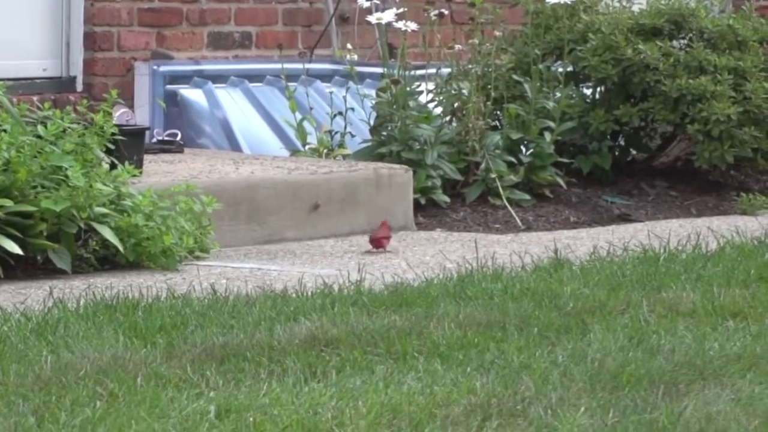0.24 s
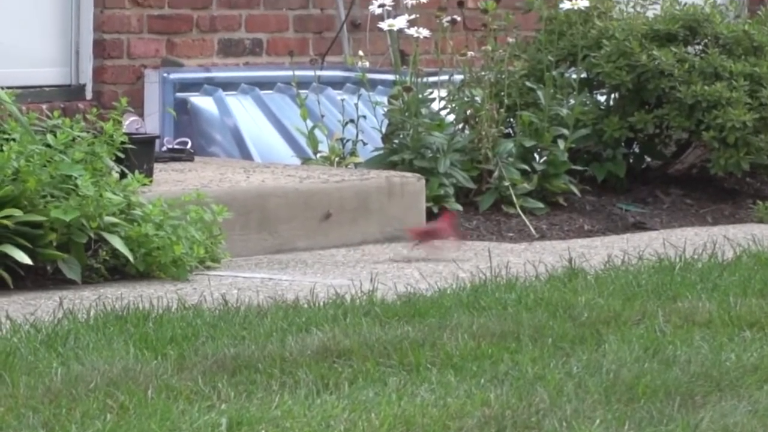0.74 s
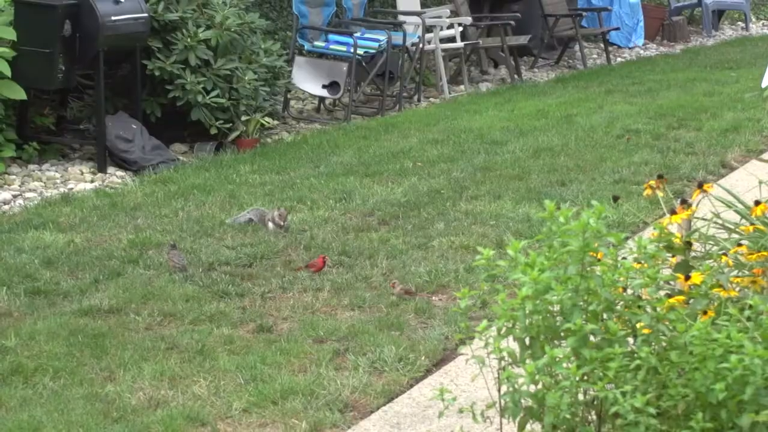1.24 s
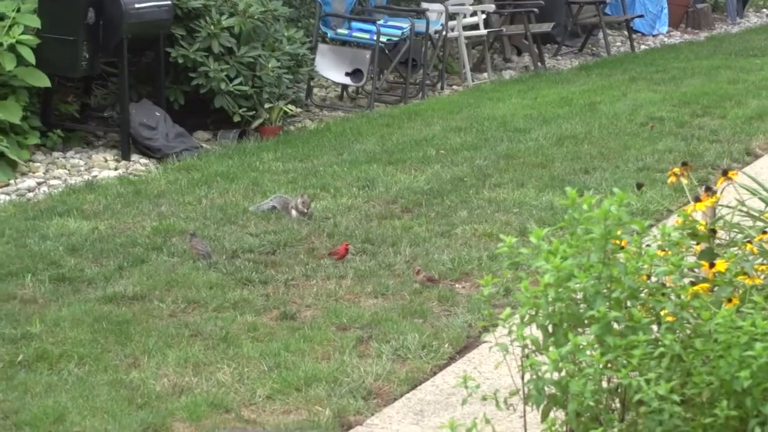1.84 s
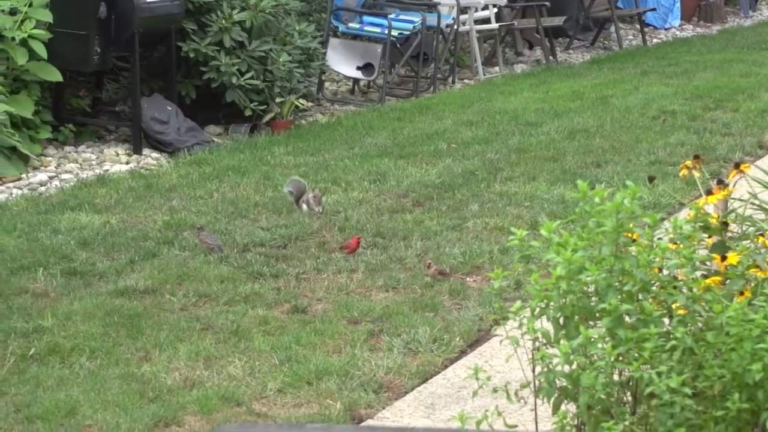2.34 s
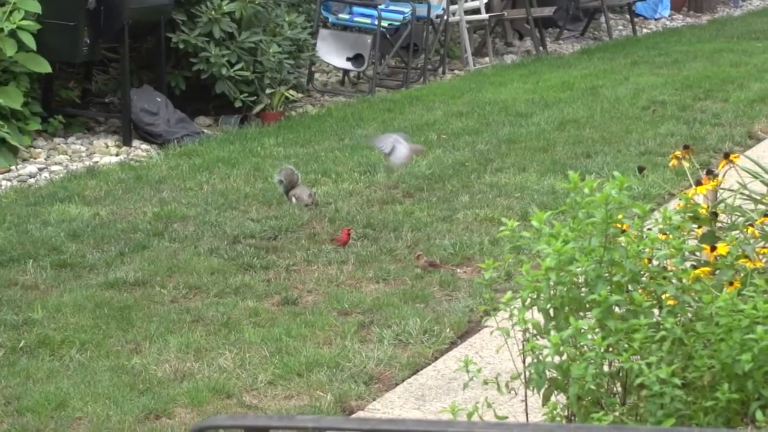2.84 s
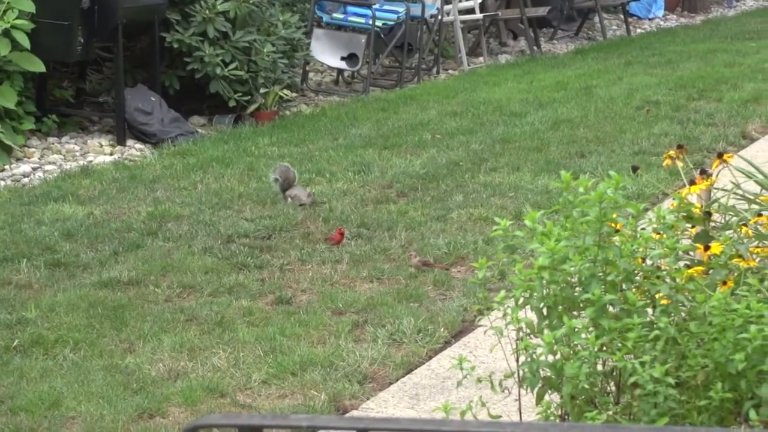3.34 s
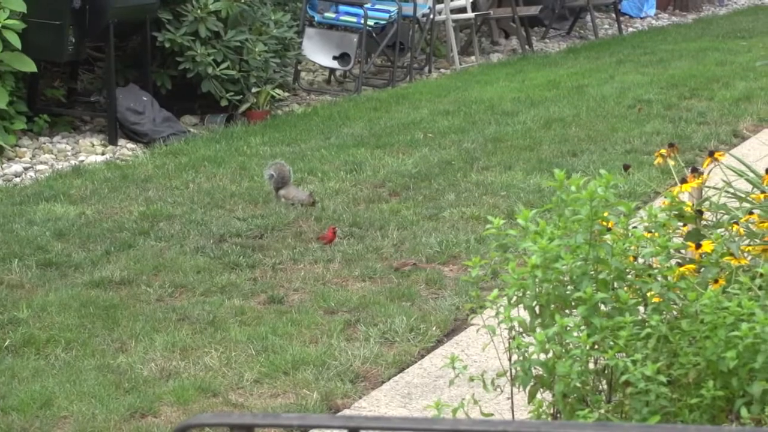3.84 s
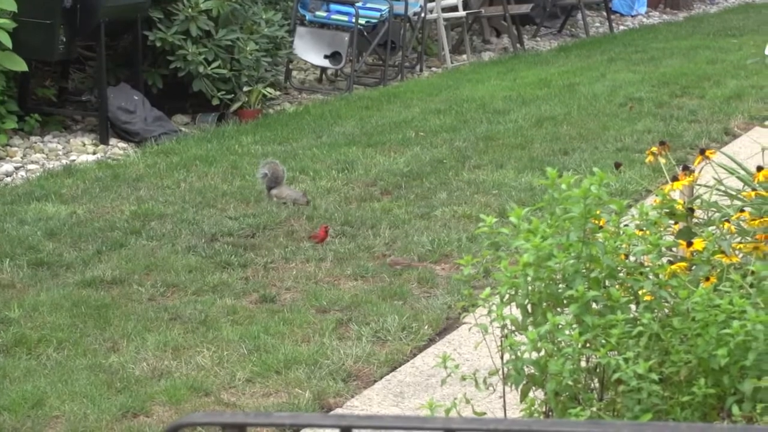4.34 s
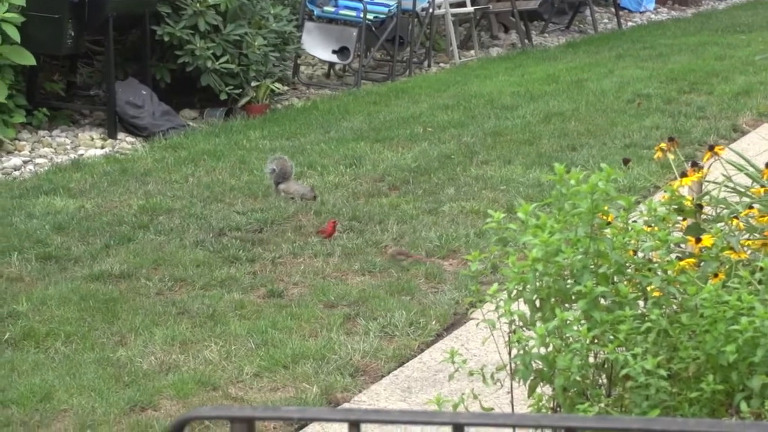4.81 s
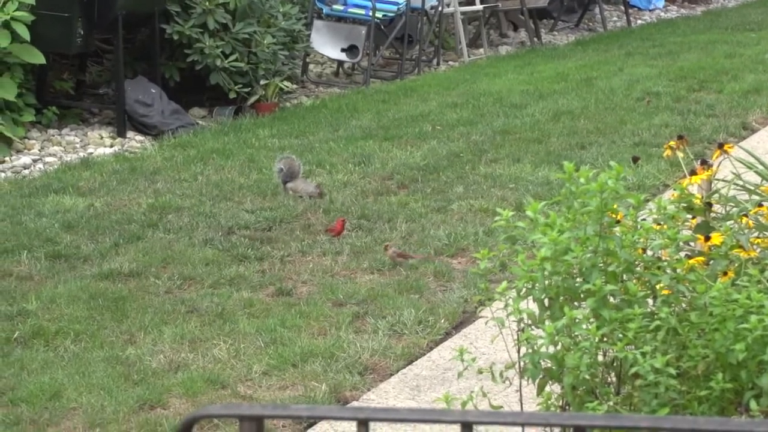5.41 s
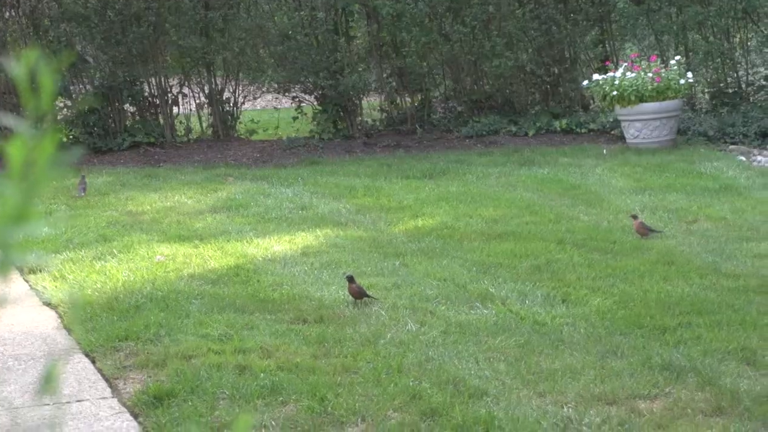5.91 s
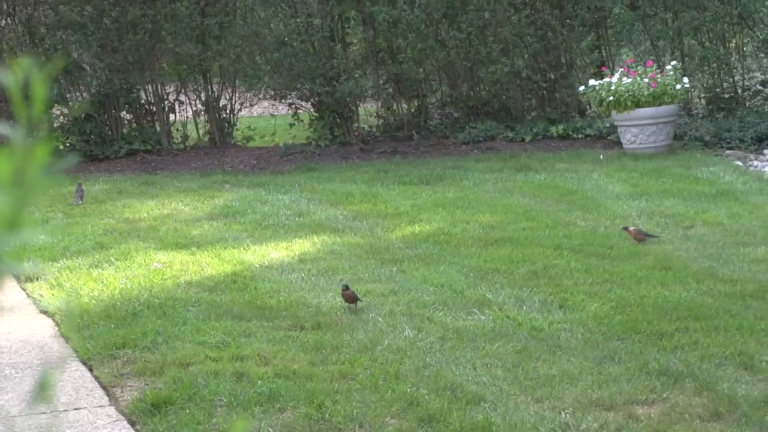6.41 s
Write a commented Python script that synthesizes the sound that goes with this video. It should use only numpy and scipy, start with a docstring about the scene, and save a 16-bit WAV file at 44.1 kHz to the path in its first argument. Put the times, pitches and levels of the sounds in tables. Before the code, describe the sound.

An open summer garden in wide stereo, with soft, quiet outdoor air. From 0 s a nearer cicada buzzes, raspy and fluttering, strongest at the start; its tone slackens and grows more hollow towards 1.3 s. Beneath it, a far motor drones low in uneven throbs, slowly climbing in pitch, with a faint rush. Tiny dry ticks snap at about 0.1, 0.3 and 0.55 s, and again at 2.2 s. A very thin insect buzz glimmers near 0.7 and 2 s. At 0.85-1.1 s a small bird gives two quick, piercing, gliding whistles. The high cricket chorus, soft at first, rises from 1 to 1.8 s. From 1.5 s the cicada dies away, gone by 3.2 s; the motor vanishes by 3.3 s. Then crickets trill steadily to the end, nearer ones pulsing within the shimmer. One barely audible tick falls at 4.2 s; faint hiss and low rumble creep in afterwards.

```python
"""A summer garden: a chorus of crickets trills all around, each nearer one a tone shaped by wing strokes. A
nearer cicada, click trains in a resonant body, buzzes beside a far motor's throbbing drone and noise rush; the
cicada and motor fade out together. Even pulses make a thin high buzz now and then. A small bird whistles two
thin, gliding calls, and a few dry ringing ticks sound over soft outdoor air made of coloured noise."""
import sys
import numpy as np
from scipy import signal
from scipy.fft import rfft, irfft
from scipy.io import wavfile

SR = 44100
rng = np.random.default_rng(int(sys.argv[2]) if len(sys.argv) > 2 else 0)


def generate_wav(signal):
    """Clip the signal to [-1, 1] and save it as 16-bit WAV at the path in sys.argv[1]."""
    frames = np.transpose(np.atleast_2d(signal))
    scaled = np.clip(frames, -1, 1) * 32767
    pcm = np.round(scaled).astype(np.int16)
    wavfile.write(sys.argv[1], SR, pcm)


N = 294147
TIME, FREQS = np.arange(N) / SR, np.fft.rfftfreq(N, 1 / SR)  # [s], [Hz]

# Spectrum levels below are relative within each table: a layer is evened to rms 1 after colouring.
# soft outdoor air all around: (frequency [Hz], density [dB per Hz])
AIR_SPECTRUM = [(12, -61), (20, -43), (70, -10.5), (152, -7.5), (190, -8), (228, -4), (262, -6.5),
                (321, -6), (385, -4), (473, -2), (580, -3.5), (874, 0), (1750, -9), (3050, -18),
                (4600, -22), (5980, -47), (10100, -120)]
AIR_DB = -47
# a faint hiss and a low rumble that creep into the air; levels once fully risen
RUMBLE_HZ, RUMBLE_WIDTH_HZ, RUMBLE_DB = 217, 120, -59
HISS_HZ, HISS_WIDTH_HZ, HISS_DB = 3770, 1200, -60
CREEP_FROM_S, CREEP_TO_S = 3.8, 6.16

# the distant crickets' blended song, and its octave: (frequency [Hz], density [dB per Hz])
CHORUS_SPECTRUM = [(4550, -35.5), (5080, -20), (5330, -18), (5640, -23), (5860, -9), (6050, -7.5),
                   (6260, -1), (6530, 0), (6900, -1), (7200, -5), (7950, -8), (8450, -18.5), (9000, -27.5),
                   (9600, -43.5)]
OCTAVE_SPECTRUM = [(5760, -52), (9800, -14.5), (11600, -13.5), (11900, -8), (12300, -4.5), (13000, 1.5),
                   (15500, -13.5)]
# gain of all crickets: soft at first, one rise, then steady
CHORUS_SOFT_DB, CHORUS_FULL_DB = -37.5, -30
CHORUS_RISE_FROM_S, CHORUS_RISE_TO_S = 1, 1.8
# nearer crickets: (pitch [Hz], pitch scatter [Hz rms], mean stroke rate [per s], stroke sharpness,
# level against the chorus before NEAR_DB [dB], time of the strongest stroke [s], spread in time [s])
NEAR_CRICKETS = [(6520, 35, 4.78, .85, -12, 4.2, 1.7), (6600, 300, 4.79, 1.7, -11, 3.292, 1.1),
                 (6600, 280, 12.32, 1.7, -7, 2.78, .55), (6550, 250, 12.5, 1.1, -9, 6.05, .8),
                 (5886, 80, 12.3, 1.8, -21.5, 4.5, 3), (6950, 170, 57, 1.2, -12.5, 5, 3),
                 (6450, 200, 52, 1.1, -14, 5, 3), (7500, 480, 23, .8, -17, 4.5, 3)]
# trim of the nearer crickets together, and how far the pitch swings within a stroke
NEAR_DB, STROKE_SAG_HZ = -0.5, 63

# the cicada holds CICADA_DB plus a surge that settles, then its level fades out
CICADA_DB, SURGE_DB, SURGE_SETTLE_S = -31.5, 4.5, 0.77
CICADA_FADE_FROM_S, CICADA_SILENT_S, FADE_BEND = 1.48, 3.17, 1.08
# mean click rate of each tymbal, the moment of full slackness, and the mean rate of the flutter
TYMBAL_HZ, SLACK_AT_S, FLUTTER_HZ = 448.8, 1.26, 33.33
# colour of its body when tense, and when slack: (frequency [Hz], density [dB per Hz])
TENSE_BODY = [(1180, -57), (2000, -16.5), (2410, -17.5), (2770, -7.5), (3100, -9), (4040, -2), (4480, -6),
              (5220, -4.5), (5690, 2), (6360, -4), (7300, 0), (8370, -13.5), (9680, -14), (10900, -23.5),
              (15500, -32)]
SLACK_BODY = [(1180, -21), (2000, -16), (2920, -11.5), (3430, -3), (3640, -5.5), (3940, -1.5), (4510, -5),
              (5590, -1.5), (6360, -3.5), (7000, 3.5), (7490, 4.5), (8590, -15.5), (9600, -22),
              (14000, -23), (15500, -35)]
# body resonances that come and go: (pitch [Hz], pitch scatter [Hz rms],
# level against the buzz [dB], time when strongest [s], spread in time [s])
BODY_RINGS = [(5650, 190, -13.5, .1, .16), (4990, 40, -17.5, .35, .25), (5530, 50, -10.5, 1.35, .65),
              (3955, 48, -9.5, 1.27, .45), (4480, 30, -18, 1.5, .7), (4870, 20, -19, 1.45, .45),
              (4130, 130, -11.5, 2.02, .42), (3400, 60, -14, 2.2, .45)]

# the far motor's firing rate climbs from the start towards the top
MOTOR_START_HZ, MOTOR_TOP_HZ, RUN_UP_S = 179.7, 223, 1.35
# throbs of its drone: (time when strongest [s], spread in time [s], level [dB])
DRONE_THROBS = [(.015, .03, -45), (.107, 0.026, -46), (.209, .025, -49), (.342, .025, -48),
                (.429, .028, -44), (.528, 0.022, -45), (.61, 0.023, -41.5), (.737, .025, -49),
                (.857, 0.018, -42), (.995, .035, -44), (1.1, .035, -45), (1.217, 0.039, -45),
                (1.346, 0.054, -44), (1.451, 0.027, -43.5), (1.524, 0.018, -39), (1.6, 0.028, -38.5),
                (1.672, 0.018, -38), (1.85, 0.056, -44), (1.951, .02, -52), (2.065, 0.017, -41),
                (2.125, 0.022, -39.5), (2.334, 0.051, -48), (2.59, 0.069, -44.5), (2.813, .04, -49),
                (2.92, .03, -56)]
DRONE_FLOOR_DB = -53  # the drone between throbs, before its fade
# other orders: (multiple of the firing rate, level [dB], time when strongest [s], spread in time [s])
DRONE_ORDERS = [(2, -47.5, .45, .13), (1.82, -51, .84, .07), (2, -55.5, 1.55, .15), (1.24, -53, 1.5, .2),
                (1.65, -56, 2.2, .15), (.63, -57, 2.5, .25)]
# the motor's rush: (frequency [Hz], density [dB per Hz])
RUSH_SPECTRUM = [(41, -50), (70, -26), (135, -11), (193, -4.5), (304, -10), (375, -5.5), (464, -21),
                 (657, -16), (958, -7.5), (1340, -13.5), (1550, -10), (2010, -14.5), (2600, -16),
                 (3380, -19), (5720, -120)]
RUSH_DB, RUSH_FADE_FROM_S, RUSH_SILENT_S = -42, 2.06, 3.3

# dry ticks: (onset time [s], peak level of the envelope [dB], ring pitch [Hz], decay [s])
DRY_TICKS = [(.1333, -18, 5600, .0002), (.3068, -11, 4600, .00028), (.5431, -19, 6050, .00015),
             (.5826, -19, 7000, .00015), (2.183, -20.5, 4750, .00045), (4.2025, -39, 3700, .00015)]
# bouts of thin, high-pitched buzz: (time when strongest [s], spread in time [s], pulse rate [Hz], level [dB])
THIN_BOUTS = [(.72, 0.12, 197, -50), (2.0, 0.39, 197, -54.5)]
# notes of the bird's two calls: (time when strongest [s], spread in time [s], pitch then [Hz],
# glide then [Hz per s], level [dB], octave against the note [dB])
CALL_NOTES = [(.867, .0075, 7970, -500, -30, -30), (.907, .006, 7970, -300, -25.5, -30),
              (.937, .015, 7975, -300, -32, -28), (.977, .01, 7830, -300, -35, -14),
              (1.003, .008, 7830, -300, -39, -15), (1.07, .013, 7660, 5000, -30.5, -17),
              (1.106, .014, 7790, 600, -29, -24)]

# stereo width of the crickets and air around: (frequency [Hz], side minus centre [dB])
SURROUND_WIDTH = [(60, -37), (200, -20), (450, -12.5), (1400, -7.5), (3300, -5.5), (5200, -16),
                  (6500, -8.5), (8300, -26), (10000, -45)]
# their left-right balance: (frequency [Hz], left minus right [dB])
SURROUND_TILT = [(600, 0.3), (1200, 1.9), (2800, -0.26), (5000, -0.14)]
# stereo width of the single sources: (frequency [Hz], side minus centre [dB])
SOURCE_WIDTH = [(60, -31), (200, -18), (550, -10), (1400, -12.5), (3000, -15.5), (7300, -6), (8300, -15),
                (10000, -62)]
# their left-right balance, rightward near 4 kHz: (frequency [Hz], left minus right [dB])
SOURCE_TILT = [(500, 0.57), (1300, 0.94), (4000, -1.8), (7000, 0.2)]
EDGE_HZ = 15700  # upper band limit


def gain_of(db):
    """Decibels to amplitude."""
    return 10 ** (np.asarray(db) / 20)


def evened(x):
    """Scales to rms 1."""
    return x / np.sqrt(np.mean(x ** 2) + 1e-20)


def read(points, hz=FREQS):
    """Reads a frequency table on a log-frequency axis."""
    f, value = np.transpose(points)
    return np.interp(np.log(hz + 1), np.log(f + 1), value)


def ramp(from_s, to_s):
    """Goes evenly from 0 to 1 between two moments."""
    return np.clip((TIME - from_s) / (to_s - from_s), 0, 1)


def fade(from_s, silent_s):
    """Holds at 1, then sinks evenly to silence."""
    return 1 - ramp(from_s, silent_s)


def swell(s, lasts, order=2):
    """A smooth rise and fall around one moment; a higher order gives a flatter top and steeper sides."""
    distance = np.minimum(abs(TIME - s) / lasts, 10)
    return np.exp(-.5 * distance ** order)


def shaped(x, gain):
    """Filters by a gain for every frequency; rms 1."""
    return evened(irfft(rfft(x) * gain, N))


def colour(points):
    """The gain of a spectrum table, falling steeply beyond its ends."""
    beyond = FREQS / np.clip(FREQS, points[0][0], points[-1][0])
    skirts = np.minimum(beyond, 1 / (beyond + 1e-9)) ** 10
    return gain_of(read(points)) * skirts


def resonance(hz, width):
    """The gain of a resonance with a rounded peak."""
    return 1 / (1 + ((FREQS - hz) / width) ** 2)


def noise():
    """Two unrelated white noises, for centre and width."""
    return rng.standard_normal((2, N))


def wander(rate):
    """A random drift of rms 1, mostly slower than the given rate in Hz."""
    return shaped(rng.standard_normal(N), np.exp(-(FREQS / rate) ** 2))


def flutter(rate, depth_db, uneven=0.148):
    """A gain of rms 1 that beats at an unsteady rate."""
    beats = np.cumsum(rate * (1 + uneven * wander(3.08))) / SR + rng.random()
    return evened(gain_of(depth_db * np.sin(2 * np.pi * beats)))


def clicks(rate):
    """One sharp pulse for each turn of a rate curve."""
    turns = np.cumsum(rate) / SR + rng.random()
    offset = (turns - np.round(turns)) * SR / rate  # samples from the nearest click
    return np.sinc(offset) * np.exp(-(offset / 10) ** 2)


def scraped(hz, scatter_hz):
    """A tone of rms 1 whose pitch trembles quickly around its centre."""
    pitch = hz + scatter_hz * wander(scatter_hz)
    return np.sqrt(2) * np.sin(2 * np.pi * np.cumsum(pitch) / SR)


def scatter(x, t60, wet_db):
    """Echoes from leaves and walls: direct sound and echoes in the centre, other echoes as width."""
    t = np.arange(SR // 2) / SR
    shape = (2, len(t))
    sparse = rng.standard_normal(shape) * (rng.random(shape) < .05)
    taps = sparse * gain_of(-60 * t / t60)
    taps *= gain_of(wet_db) / np.linalg.norm(taps[0])
    taps[0, 0] += 1  # direct sound
    return signal.fftconvolve(x[None], taps, axes=1)[:, :N] / np.linalg.norm(taps[0])


def spread(pair, width, tilt):
    """Row 0 becomes the centre and row 1 the side, mixed to left and right."""
    mid, side = rfft(pair[0]), rfft(pair[1]) * gain_of(read(width))
    lean = gain_of(read(tilt) / 2)
    return irfft(np.array([(mid + side) * lean, (mid - side) / lean]), N)


def air():
    """The steady, soft wash of far traffic and leaves; a faint hiss and a low rumble grow in it."""
    wash = shaped(noise(), colour(AIR_SPECTRUM)) * gain_of(AIR_DB)
    hiss = shaped(noise(), resonance(HISS_HZ, HISS_WIDTH_HZ)) * gain_of(HISS_DB)
    rumble = shaped(noise(), resonance(RUMBLE_HZ, RUMBLE_WIDTH_HZ)) * gain_of(RUMBLE_DB)
    return wash + (hiss + rumble) * ramp(CREEP_FROM_S, CREEP_TO_S)


def crickets(far_db=-2.0, octave_db=-27, drift=0.0039):
    """Far singers blend into noise; nearer ones come and go, each wing closing a scraped, sagging tone."""
    song = gain_of(far_db) * shaped(noise(), colour(CHORUS_SPECTRUM))
    song += gain_of(octave_db) * shaped(noise(), colour(OCTAVE_SPECTRUM))
    for hz, scatter_hz, rate, sharpness, db, s, lasts in NEAR_CRICKETS:
        turns = np.cumsum(rate * (1 + drift * wander(1.8))) / SR
        wing = 2 * np.pi * (turns - np.interp(s, TIME, turns))  # a stroke peaks at time s
        strokes = evened(np.exp(sharpness * np.cos(wing)))
        for row in song:  # separate tones for centre and width
            tone = scraped(hz - STROKE_SAG_HZ * np.sin(wing), scatter_hz)
            row += gain_of(NEAR_DB + db) * swell(s, lasts) * strokes * tone
    risen = ramp(CHORUS_RISE_FROM_S, CHORUS_RISE_TO_S)
    return song * gain_of(CHORUS_SOFT_DB + (CHORUS_FULL_DB - CHORUS_SOFT_DB) * risen)


def cicada(rasp_db=-5.5, jitter=.075, drift=.02, flutter_db=1.1, ring_flutter_db=4.0):
    """Two tymbals buckle hundreds of times a second into a fluttering hollow body that slackens."""
    rate = TYMBAL_HZ * (1 + drift * wander(1))
    tension = fade(0, SLACK_AT_S)
    ribs = sum(clicks(rate * (1 + jitter * wander(60.02))) for _ in range(2))
    drive = evened(scatter(ribs, t60=0.14, wet_db=2.5)) + gain_of(rasp_db) * noise()
    tense, slack = shaped(drive, colour(TENSE_BODY)), shaped(drive, colour(SLACK_BODY))
    buzz = tension * tense + (1 - tension) * slack
    buzz *= flutter(FLUTTER_HZ, flutter_db)
    for hz, scatter_hz, db, s, lasts in BODY_RINGS:
        tones = np.array([scraped(hz, scatter_hz) for _ in range(2)])
        ring = tones * flutter(FLUTTER_HZ, ring_flutter_db)
        buzz += gain_of(db) * swell(s, lasts, order=4) * ring
    effort_db = CICADA_DB + SURGE_DB * np.exp(-TIME / SURGE_SETTLE_S)
    return buzz * gain_of(effort_db) * fade(CICADA_FADE_FROM_S, CICADA_SILENT_S) ** FADE_BEND


def motor(waver=0.008, blur_hz=16):
    """A far motor gathers speed: its drone comes in uneven throbs, with blurred orders and a low rush."""
    hz = MOTOR_TOP_HZ + (MOTOR_START_HZ - MOTOR_TOP_HZ) * np.exp(-TIME / RUN_UP_S)
    phase = 2 * np.pi * np.cumsum(hz * (1 + waver * wander(20.4))) / SR
    throbs = sum(gain_of(db) * swell(s, lasts, order=3) for s, lasts, db in DRONE_THROBS)
    presence = fade(RUSH_FADE_FROM_S, RUSH_SILENT_S)
    level = np.maximum(throbs, gain_of(DRONE_FLOOR_DB) * presence)
    drone = np.sqrt(2) * np.sin(phase) * level
    for multiple, db, s, lasts in DRONE_ORDERS:
        blurred = wander(blur_hz) * np.sin(multiple * phase) + wander(blur_hz) * np.cos(multiple * phase)
        drone += gain_of(db) * swell(s, lasts) * blurred
    rush = shaped(noise(), colour(RUSH_SPECTRUM)) * gain_of(RUSH_DB) * presence
    return rush + drone * [[1], [0]]  # the drone sits in the centre, without width


def ticks(crack_db=-11):
    """Small dry snaps: a brief crack and a ring of a few cycles, with a very short echo."""
    out = np.zeros(N)
    for s, db, hz, decay in DRY_TICKS:
        age = np.maximum(TIME - s, 0)
        crack = shaped(rng.standard_normal(N), resonance(hz, hz / 2) ** 2)
        snap = np.sin(2 * np.pi * hz * age) + gain_of(crack_db) * crack
        envelope = age / decay * np.exp(1 - age / decay)
        out += gain_of(db) * envelope * snap
    return scatter(out, t60=0.039, wet_db=-7)


def thin_buzz(ring_hz=9400, width=1100):
    """A second insect clicks so evenly that it draws a comb of fine high tones."""
    out = np.zeros((2, N))
    for s, lasts, hz, db in THIN_BOUTS:
        pulses = scatter(clicks(hz * (1 + 0.00041 * wander(11.4))), t60=0.14, wet_db=8)
        out += shaped(pulses, resonance(ring_hz, width)) * gain_of(db) * swell(s, lasts)
    return out


def bird(settle_s=0.023):
    """Thin, nearly pure whistles with a short echo; each note swells, glides ever more slowly and fades."""
    voice = np.zeros(N)
    for s, lasts, hz, glide, db, octave_db in CALL_NOTES:
        slide_s = settle_s * (1 - np.exp(np.minimum((s - TIME) / settle_s, 2)))
        pitch = (hz + glide * slide_s) * (1 + 0.0024 * wander(140))
        phase = 2 * np.pi * np.cumsum(pitch) / SR
        whistle = np.sin(phase) + gain_of(octave_db) * np.sin(2 * phase)
        voice += np.sqrt(2) * gain_of(db) * swell(s, lasts) * whistle
    return scatter(voice, t60=.15, wet_db=-9)


def scene():
    """The surrounding chorus and air, and the single sources within them."""
    around = spread(air() + crickets(), SURROUND_WIDTH, SURROUND_TILT)
    singles = cicada() + motor() + ticks() + thin_buzz() + bird()
    return around + spread(singles, SOURCE_WIDTH, SOURCE_TILT)


def record(dry):
    """A steep low-pass filter: nothing sounds above EDGE_HZ."""
    lowpass = signal.firwin(2047, EDGE_HZ, window=("kaiser", 9), fs=SR)
    return signal.oaconvolve(dry, lowpass[None], "same")


dry = scene()
out = record(dry)
generate_wav(out)
```